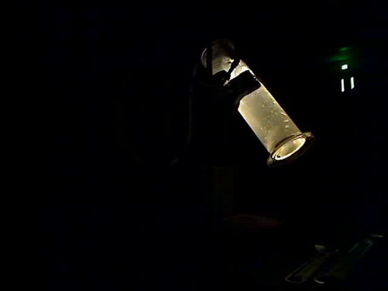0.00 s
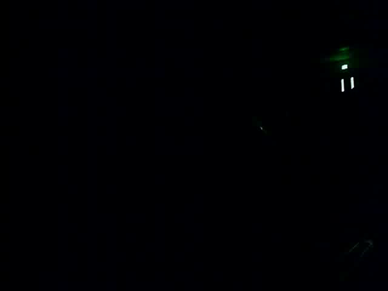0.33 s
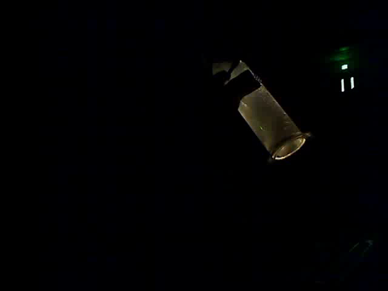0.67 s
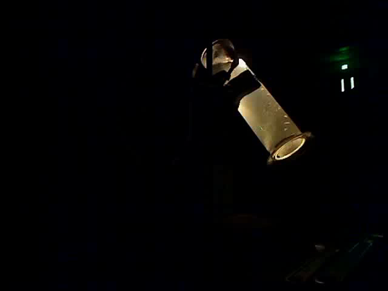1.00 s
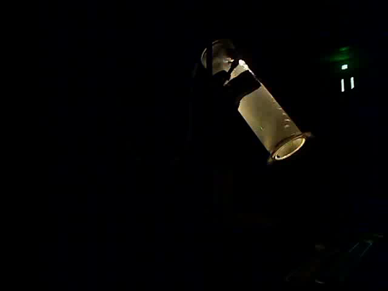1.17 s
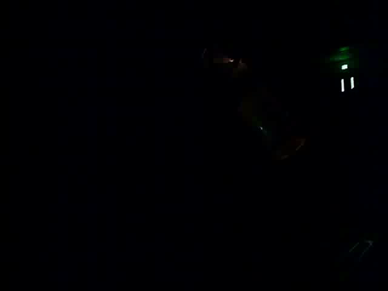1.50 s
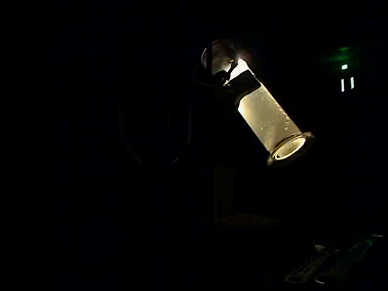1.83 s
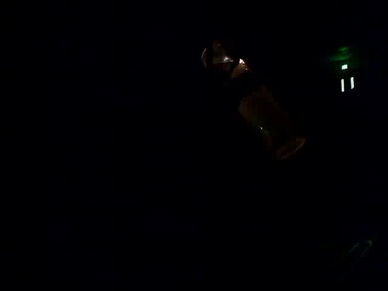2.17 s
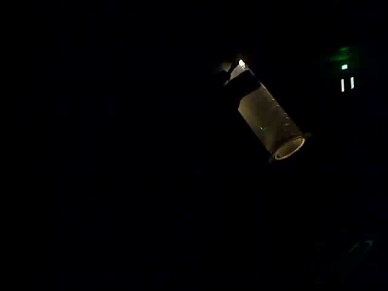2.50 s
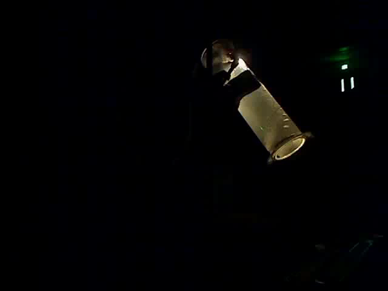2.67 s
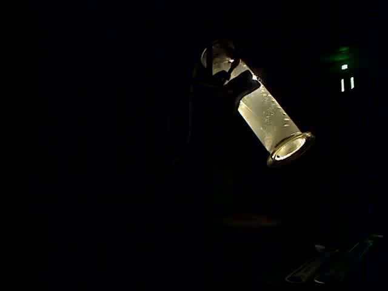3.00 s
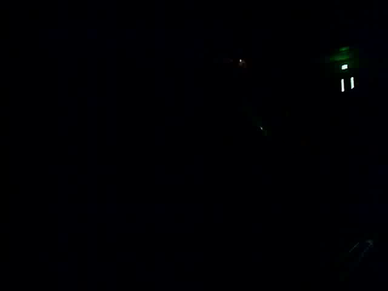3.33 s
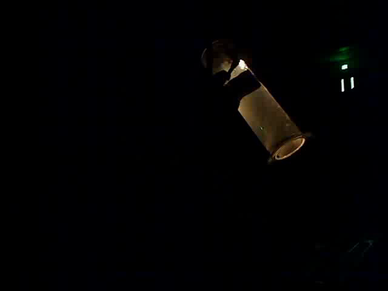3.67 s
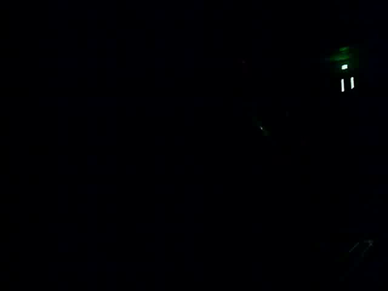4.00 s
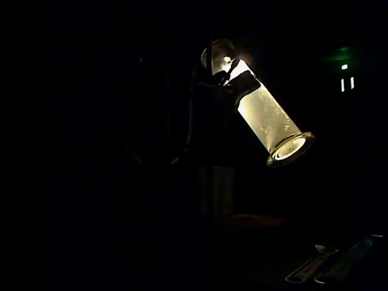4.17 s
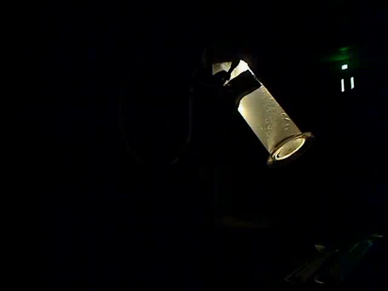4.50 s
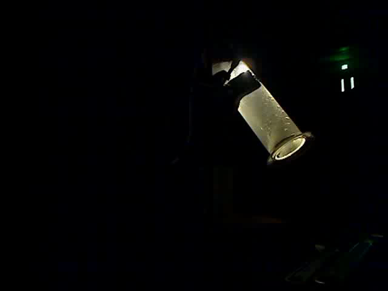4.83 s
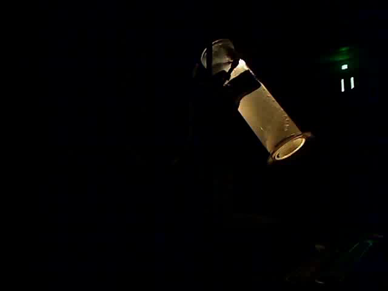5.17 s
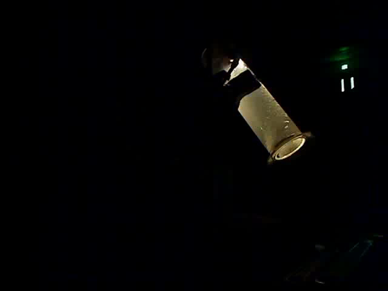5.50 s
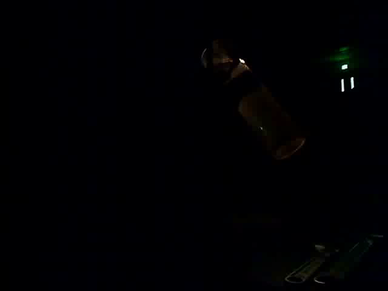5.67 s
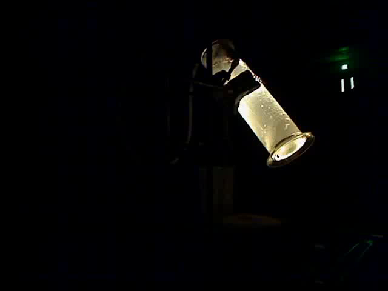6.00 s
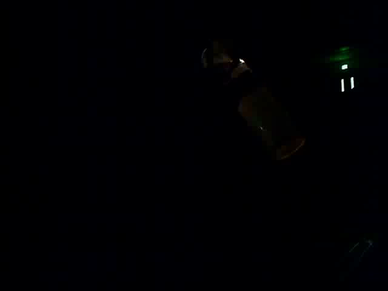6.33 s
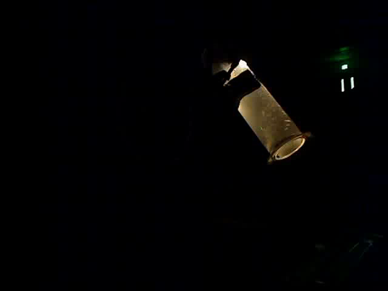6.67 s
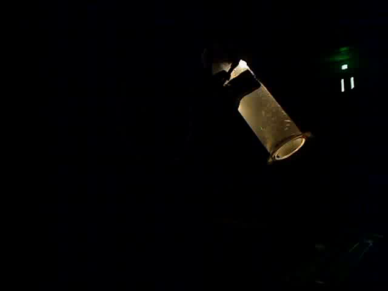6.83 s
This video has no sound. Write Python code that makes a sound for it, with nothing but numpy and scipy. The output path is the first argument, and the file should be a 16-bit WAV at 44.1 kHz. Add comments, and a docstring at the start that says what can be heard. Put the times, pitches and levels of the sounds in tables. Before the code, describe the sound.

Gas bubbles ignite in a glass tube of liquid, giving short, irregular pops mixed with wet rising plops, plinks and tiny snaps. A strong, hollow pop comes at 0.2 seconds, then softer pops and plops, with a clear plop at 1.5. A sharp double crack lands at 1.8. Sparse small ticks follow, then a bubbly cluster from 3 to 3.4. A loud, very short plop hits at 4.2, a bright plink at 4.6 and a ringing pop at 4.8. Lighter pops continue, growing busier from 5.9, with a pop and a loud double plop around 6.7 and two snaps near 7. Faint spitting gas hisses swell at 0.6, 3.4 and from about 6 to the end. The quiet room adds a short echo, low rumble and ventilation hum. The microphone sounds dull and cracks on the loudest peaks.

```python
"""Gas bubbles ignite at the mouth of a tilted glass tube of liquid, on a dull microphone in a quiet room. Each
ignition is a short pressure pop; the rounder ones ring the tube's air column, and air pockets plink or glide
upward as liquid fills them. Small bubbles snap and gas hisses now and then. Near surfaces and the room throw
the pops and rings back over a low rumble and ventilation hum. The loudest peaks flatten, and the highest wrap
round with a crack."""
import sys
import numpy as np
from scipy import signal
from scipy.fft import rfft, irfft
from scipy.io import wavfile

SR = 44100
rng = np.random.default_rng(int(sys.argv[2]) if len(sys.argv) > 2 else 0)


def store_pcm(level_fs):
    """Save levels as 16-bit WAV."""
    pcm = np.round(np.clip(level_fs, -1, 1) * 32767).astype(np.int16)
    wavfile.write(sys.argv[1], SR, np.atleast_2d(pcm).T)


N = 315756

# rounder pops that ring the tube's air column:
# start_s, pop_db, relax_ms, ring_db, pitch_ratio (set by the liquid's height)
RINGING_IGNITIONS = [(0.1817, -7, 0.2, -28, 1.036), (0.5782, -19, 0.97, -24, 1.016),
                     (0.696, -17.5, 0.41, -31.5, 1.3), (0.8892, -22, 0.35, -31, 1.04),
                     (1.4955, -21.5, .6, -23.5, 1.005), (3.067, -19, 0.51, -25.5, 1.024),
                     (4.441, -14.5, 0.37, -29, 1.06), (4.7874, -11, 0.27, -27.5, 0.99),
                     (5.9513, -27, 1.7, -25.5, 1.01), (5.994, -18.5, 0.57, -31, 1.04),
                     (6.2341, -18.5, 0.99, -20.5, 1.0), (6.617, -8, 0.19, -30, 1)]


def amp(db):
    """Decibels to gain."""
    return 10 ** (np.asarray(db) / 20)


def unit(x):
    """Scales to rms 1."""
    return x / np.sqrt(np.mean(x ** 2) + 1e-20)


def read(points, hz):
    """Joins (Hz, value) points on a log-frequency axis."""
    f, value = np.transpose(points)
    return np.interp(np.log(hz + 1), np.log(f + 1), value)


def add(mix, s, sound):
    """Mixes a sound in at time s."""
    part = mix[max(round(s * SR), 0):][:len(sound)]
    part += sound[:len(part)]


def bell(f, hz, octaves):
    """A bell-shaped band on the log-frequency axis."""
    return np.exp(-.5 * (np.log2((f + 1) / hz) / octaves) ** 2)


def noise(shape, size):
    """Noise of rms 1 whose spectrum follows shape(f)."""
    return unit(irfft(rfft(rng.standard_normal(size)) * shape(np.fft.rfftfreq(size, 1 / SR)), size))


def lowpass(x, hz):
    """Steep band limit."""
    return signal.oaconvolve(x, signal.firwin(255, hz, window=("kaiser", 9), fs=SR), "same")


def flutter(size, hz):
    """Random wavering of rms 1, no faster than about hz."""
    return noise(lambda f: np.exp(-(f / hz) ** 2), size + SR // 10)[:size]


def glide(first_hz, ratio, length, curve=1):
    """A pitch that climbs by a ratio over its length."""
    return first_hz * ratio ** (np.arange(0, length, 1 / SR) / length) ** curve


def background(air_db=-40):
    """The quiet room itself: rumble, faint hiss and wavering ventilation hum."""
    # spectrum of the room's air: frequency_hz, relative_db
    air_spectrum = [(8.8, -37.5), (15, 4.5), (91, -13), (132, -13.5), (163, -12.5), (191, -20.5),
                    (224, -17), (263, -23), (301, -24.5), (424, -31.5), (497, -28), (539, -32), (2080, -44),
                    (5000, -48.5), (8500, -56), (11000, -93), (18700, -120)]
    # ventilation hum and thin whines: pitch_hz, rms_db, width_hz
    hum_bands = [(26.5, -51, 3.4), (160.6, -53.5, 7.1), (510, -80.5, 5.5), (5190, -78, 50),
                 (6890, -78, 190)]
    air = amp(air_db) * noise(lambda f: amp(read(air_spectrum, f)), N)
    ventilation = sum(amp(db) * noise(lambda f: 1 / (1 + (2 * (f - hz) / width) ** 2), N)
                      for hz, db, width in hum_bands)
    return air + ventilation


def room(x, onset_s=0.0049, build_s=0.0087):
    """Near surfaces answer first; then a diffuse tail dies band by band, and standing waves ring on."""
    # early reflections, each favouring one band: delay_s, level_db, centre_hz, width_octaves
    early_echoes = [(.0092, -7, 2400, 0.94), (0.0118, -14, 1170, 0.65), (0.0325, -4.5, 2970, .3),
                    (.0362, -5, 3100, 0.27), (0.042, -13.5, 540, 0.23), (.055, -7, 482, .29)]
    # diffuse reverberation: frequency_hz, level_db, t60_s
    tail_bands = [(99, -9, 0.46), (297, -5.5, 0.64), (550, -4.5, 0.93), (846, -8.5, 0.71), (1036, -15, 0.4),
                  (1190, -5, 0.82), (1280, -15, 0.79), (1742, -7.5, 0.91), (2550, -4.5, .65), (2950, 1, .8),
                  (4020, -6, 0.77), (7640, -10, 1)]
    # standing waves between the walls: pitch_hz, resonance_db, t60_s
    standing_waves = [(262.4, 5, 0.99), (475.6, -1, 0.084), (535, -3.5, 0.51), (624, 7, 0.82),
                      (763, -4, 0.36), (1090, -16, .6)]
    t, f = np.arange(SR) / SR, np.fft.rfftfreq(SR, 1 / SR)
    early = irfft(sum(amp(db) * bell(f, hz, octaves) * np.exp(-2j * np.pi * f * delay)
                      for delay, db, hz, octaves in early_echoes))
    table = np.array(tail_bands)
    band_hz, frame_s, spectra = signal.stft(rng.standard_normal(SR), SR, nperseg=512)
    band_db = read(table[:, :2], band_hz)[:, None]
    band_t60 = read(table[:, [0, 2]], band_hz)[:, None]
    equal_energy = np.sqrt(np.log(1e6) / (band_t60 * SR))
    spectra = spectra * amp(band_db - 60 * frame_s / band_t60) * equal_energy
    tail = signal.istft(spectra, SR, nperseg=512)[1][:SR]
    for hz, db, t60 in standing_waves:
        tail += amp(db - 60 * t / t60) * np.sin(2 * np.pi * hz * t) * np.log(1e6) / (t60 * SR)
    fade_in = np.clip((t - onset_s) / build_s, 0, 1)
    return signal.fftconvolve(x, early + tail * fade_in)[:N]


def hisses(spit_db=1.5, spit_hz=130, fall_over_rise=1.6):
    """Soft swells of escaping gas, spitting unevenly through the wet mouth."""
    # escapes of gas: crest_s, crest_db, rise_s, centre_hz, width_octaves
    gas_escapes = [(.61, -52, 0.031, 2100, 0.49), (3.44, -53.5, .085, 2200, 0.47),
                   (3.44, -64, 0.068, 4420, 0.35), (5.83, -61, 0.035, 4300, 0.41),
                   (5.988, -55, 0.039, 2300, 0.51), (6.268, -52.5, 0.031, 2400, 0.45),
                   (6.62, -57, 0.11, 4600, 0.4), (7.132, -50.5, .11, 4600, 0.36),
                   (7.13, -50, 0.2, 2300, 0.39)]
    out, t = np.zeros(N), np.arange(SR) / SR - .5
    for crest, db, rise, hz, octaves in gas_escapes:
        swell = np.exp(-(t / np.where(t < 0, rise, fall_over_rise * rise)) ** 2)
        spits = unit(amp(spit_db * flutter(SR, spit_hz)))
        gas = noise(lambda f: bell(f, hz, octaves), SR)
        add(out, crest - .5, amp(db) * swell * spits * gas)
    return out


def snaps(decay_s=0.0024, size=1024):
    """A thin film tears: a crackle of a few milliseconds in one band, higher for a smaller bubble."""
    # small bubbles bursting: start_s, level_db, centre_hz, width_octaves
    small_bubbles = [(0.0655, -41, 4860, 1), (0.148, -40, 5770, 0.25), (0.5855, -42.5, 5100, 0.6),
                     (1.6464, -44, 4700, 0.46), (1.8145, -24, 4680, 0.23), (1.8291, -23, 2870, 0.21),
                     (2.695, -40, 3150, 0.56), (2.7826, -42.5, 4750, .9), (2.7939, -43.5, 2900, .3),
                     (3.3554, -39.5, 2570, 0.72), (3.7695, -42.5, 6254, .2), (3.854, -48, 5800, 0.55),
                     (3.9101, -35.5, 5630, 1), (4.2339, -33, 5710, .2), (4.4397, -28, 2600, 0.29),
                     (4.637, -40.5, 5380, 0.35), (5.2288, -41.5, 4630, .4), (5.5998, -25.5, 1810, 0.3),
                     (5.9608, -35.5, 5370, 0.39), (6.2392, -32.5, 5390, 0.66), (6.245, -36, 5400, 0.83),
                     (6.8815, -26.5, 3200, .45), (7.0686, -24.5, 5200, 0.29)]
    out, t, f = np.zeros(N), np.arange(size) / SR, np.fft.rfftfreq(size, 1 / SR)
    for start, db, hz, octaves in small_bubbles:
        tear = rfft(rng.standard_normal(size) * np.exp(-t / decay_s))
        burst = irfft(tear / abs(tear) * bell(f, hz, octaves))
        burst = burst * (1 - t / t[-1]) * (1 - np.exp(-t * hz))
        add(out, start, amp(db) * unit(burst) * np.sqrt(decay_s * SR / size) / 2)
    return out


def pocket(hz, swell_s, fall_db, froth_db, rise_power=0.83, release_s=0.0031):
    """Trapped air rings along a pitch curve, swelling and dying, with a weak upper mode and froth."""
    t, length = np.arange(len(hz)) / SR, len(hz) / SR
    # the sloshing surface makes pitch and level waver as the tone goes on
    slosh = flutter(SR // 4, 110)[:len(t)] * np.minimum(t / .03, 1)
    phase = 2 * np.pi * np.cumsum(hz * (1 + .012 * slosh)) / SR
    rise = np.minimum(t / swell_s, 1) ** rise_power
    fall = amp(-fall_db * np.maximum(t - swell_s, 0) / max(length - swell_s, release_s))
    level = amp(2 * slosh) * rise * fall * np.minimum((length - t) / release_s, 1)
    upper_mode = amp(-30) * np.sin(1.4 * phase)
    froth = amp(froth_db) * noise(lambda f: bell(f, hz[0], octaves=0.39), SR // 4)[:len(t)]
    return level * (np.sin(phase) + upper_mode + froth)


def plinks():
    """A struck air pocket speaks at once and bends up a little as it dies."""
    # struck air pockets: start_s, level_db, pitch_hz, length_s
    struck_pockets = [(.068, -26, 1064, 0.0063), (.069, -29, 753, 0.021), (0.581, -28, 890, 0.033),
                      (1.192, -26, 917, 0.04), (2.4788, -20, 1034, 0.0072), (2.48, -24.5, 1756, 0.0069),
                      (3.302, -26, 597, 0.043), (3.355, -31.5, 152.3, 0.091), (3.797, -37, 206.5, 0.17),
                      (4.634, -6, 900, 0.016), (5.329, -23, 1577, 0.015), (5.954, -26, 1110, 0.028),
                      (6.303, -27.5, 1657, 0.014)]
    out = np.zeros(N)
    for start, db, first_hz, length in struck_pockets:
        hz = glide(first_hz, 1.15, length)
        add(out, start, amp(db) * pocket(hz, swell_s=0.0013, fall_db=17, froth_db=-13.5))
    return out


def plops(bloom_hz=1126, off_bloom_db=-9.5, dull_hz=1250, dull_db_per_octave=10.5):
    """A shrinking air pocket glides up, blooms near 1.1 kHz and fades quickly above it."""
    # air pockets filling with liquid: start_s, level_db, first_hz, last_hz, length_s
    filling_pockets = [(.085, -40.5, 840, 1220, 0.058), (0.694, -25.5, 961, 1540, 0.023),
                       (0.92, -35, 880, 1585, .04), (1.232, -24.5, 732, 1278, 0.054),
                       (1.236, -33.5, 987, 1850, 0.034), (1.512, -13.5, 619, 1580, 0.046),
                       (3.078, -27.5, 756, 1380, 0.037), (3.275, -14.5, 653, 1530, 0.039),
                       (3.767, -32.5, 727, 1179, 0.088), (4.2202, -0.5, 933, 1293, 0.011),
                       (4.633, -20.5, 1096, 1380, .026), (6.235, -24.5, 740, 1228, 0.057),
                       (6.3, -12.5, 940, 1760, 0.0065), (6.615, -24, 1024, 1604, 0.027),
                       (6.643, -30.5, 890, 1533, 0.047), (6.687, -5, 680, 875, 0.017),
                       (6.707, -5.5, 800, 1302, 0.022)]
    out = np.zeros(N)
    for start, db, first_hz, last_hz, length in filling_pockets:
        hz = glide(first_hz, last_hz / first_hz, length, curve=1.15)
        bloom_db = off_bloom_db * (1 - bell(hz, bloom_hz, octaves=0.21))
        dull_db = dull_db_per_octave * np.maximum(np.log2(hz / dull_hz), 0)
        plop = pocket(hz, swell_s=.4 * length, fall_db=10.5, froth_db=-24.5, rise_power=0.36)
        add(out, start, amp(db + bloom_db - dull_db) * plop)
    return out


def column_rings(pivot_hz=480, even_relax_ms=0.36, pitch_scatter=.015, scatter_db=1.65):
    """A rounder pop rings the air column: slow pops favour its low modes, quick ones its high modes."""
    # modes of the tube's air column: pitch_hz, relative_db, length_s
    column_modes = [(258.5, -10, 0.025), (335, -13.5, 0.0061), (467, 2.5, 0.026), (601, -10, .03),
                    (750, -10, 0.058), (890, -16, 0.079), (1111, -9, 0.035), (1285, -14.5, 0.014),
                    (1780, -25, .03)]
    out = np.zeros(N)
    for start, _, relax_ms, ring_db, pitch_ratio in RINGING_IGNITIONS:
        tilt_db_per_octave = 4 * np.log2(even_relax_ms / relax_ms)
        for hz, mode_db, length in column_modes:
            detune, level_draw = rng.standard_normal(2)  # the liquid never stands the same
            bent_hz = glide(hz * pitch_ratio * (1 + pitch_scatter * detune), 1.07, length)
            ring = pocket(bent_hz, swell_s=0.003, fall_db=13, froth_db=-9.5)
            tilt_db = tilt_db_per_octave * np.log2(hz / pivot_hz)
            add(out, start, amp(ring_db + mode_db + tilt_db + scatter_db * level_draw) * ring)
    return out


def ignition_pops(dry_jump_ms=0.056, round_jump_ms=0.28):
    """Gas ignites: pressure sinks, jumps up and relaxes; the microphone dulls the pulse."""
    # ignitions that leave the column silent: centre_s, level_db, relax_ms (also the suction time)
    dry_ignitions = [(.0642, -26, 0.77), (.1248, -22, 1.6), (1.1881, -26, 0.41), (1.1943, -23, 0.4),
                     (1.224, -25, 1.6), (1.302, -25, 0.17), (1.6459, -18, 0.17), (1.8145, -4.5, 0.074),
                     (1.8293, -7, 0.13), (2.128, -27.5, 0.38), (2.4788, -18, 0.13), (2.6956, -31.5, 0.47),
                     (2.7842, -27, 0.86), (2.793, -18.5, 1.34), (2.966, -40, 1.4), (3.053, -30.5, 0.73),
                     (3.256, -24.5, 1.1), (3.275, -23.5, 0.68), (3.3537, -19.5, 0.55), (3.7674, -25, 0.23),
                     (4.135, -34.5, .2), (4.218, -16, 0.32), (4.2488, -22.5, 1.6), (5.2285, -19, 0.27),
                     (5.3318, -18.5, 0.15), (5.495, -24, 0.25), (5.6, -21.5, 0.33), (5.882, -34, 0.62),
                     (5.8976, -29.5, .65), (6.5206, -25.5, 1.3), (6.6839, -18, 0.42), (6.8824, -16, 0.12),
                     (7.0686, -16, 0.2)]
    # the pops' dull colour through the microphone, ringing near 1.1 kHz and dropping steeply above:
    # frequency_hz, gain_db
    pop_colour = [(50, 4), (800, 4), (980, 6.5), (1140, 13.5), (1280, -2.5), (1450, -1), (2000, -9),
                  (2800, -12.5), (7000, -28.5), (9000, -50)]
    out, ms = np.zeros(N), np.arange(-300, 300) / SR * 1000
    for ignitions, jump_ms in (dry_ignitions, dry_jump_ms), (RINGING_IGNITIONS, round_jump_ms):
        for centre, db, relax_ms, *_ in ignitions:
            pulse = amp(db) * np.tanh(ms / jump_ms) * np.exp(-abs(ms) / relax_ms)
            add(out, centre - len(ms) / 2 / SR, pulse)
    # minimum phase: the ringing comes only after the pulse
    log_gain = np.log(amp(read(pop_colour, abs(np.fft.fftfreq(4096, 1 / SR)))))
    colour_spectrum = np.exp(np.conj(signal.hilbert(log_gain)))
    colour_response = np.fft.ifft(colour_spectrum).real[:2048]
    return signal.oaconvolve(out, colour_response)[:N]


def scene():
    """The tube's sounds, direct and off the walls, with dry hisses and room tone, as one channel."""
    tube = ignition_pops() + column_rings() + plops() + plinks() + snaps()
    return (tube + room(tube) + hisses() + background())[None]


def record(dry, mic_edge_hz=8150, output_edge_hz=16600, ceiling=.73, wrap_rank=11):
    """A dull microphone; the loudest peaks flatten, and the highest samples wrap round with a crack."""
    mic = lowpass(dry[0], mic_edge_hz)
    wraps = mic > np.sort(mic)[-wrap_rank]
    soft = signal.windows.hann(5)
    polarity = 1 - 2 * np.convolve(wraps, soft / soft.sum(), "same")
    overloaded = np.clip(mic, -ceiling, ceiling) * polarity
    return lowpass(overloaded, output_edge_hz)[None]


dry = scene()
out = record(dry)
store_pcm(out)
```